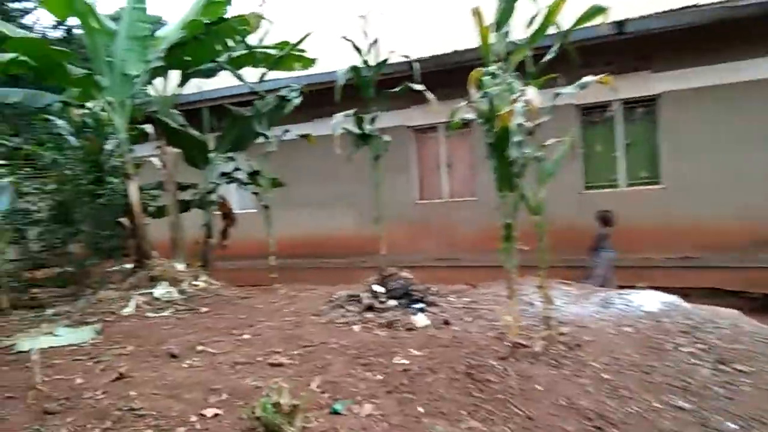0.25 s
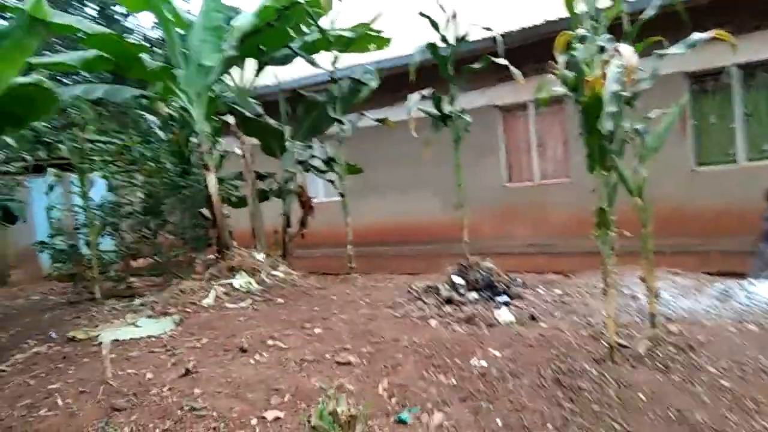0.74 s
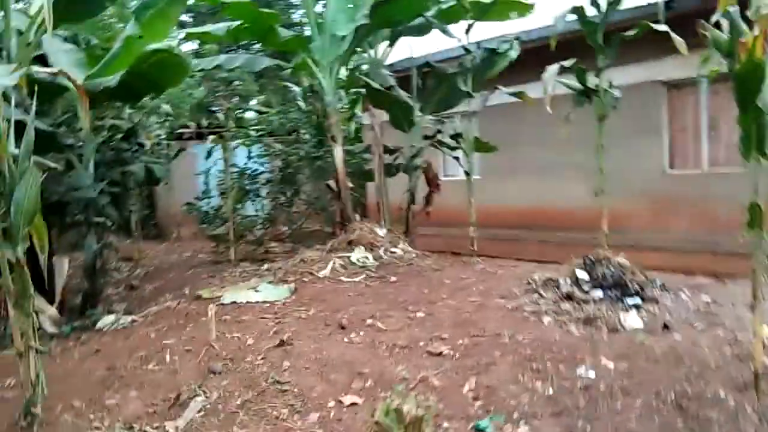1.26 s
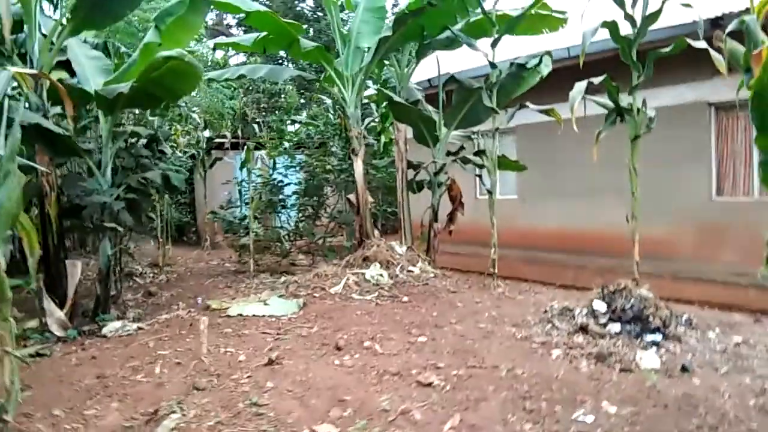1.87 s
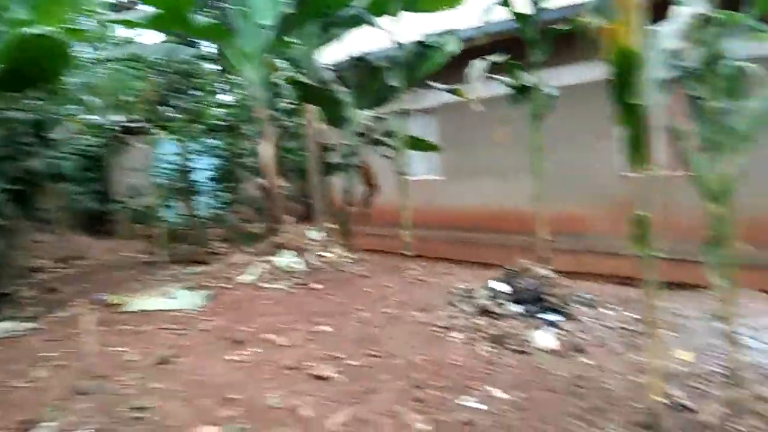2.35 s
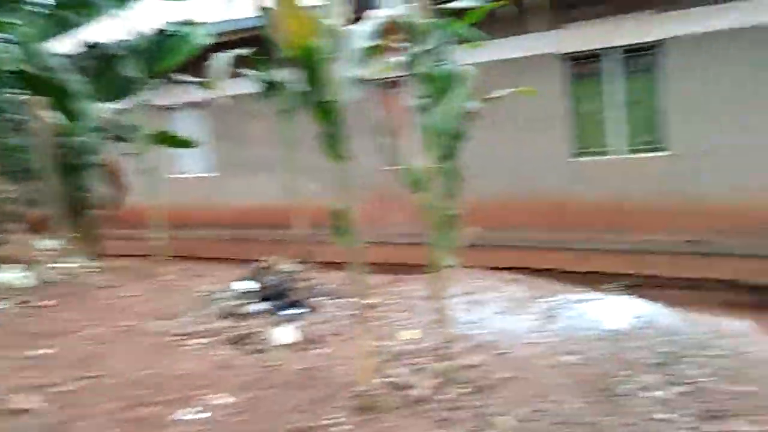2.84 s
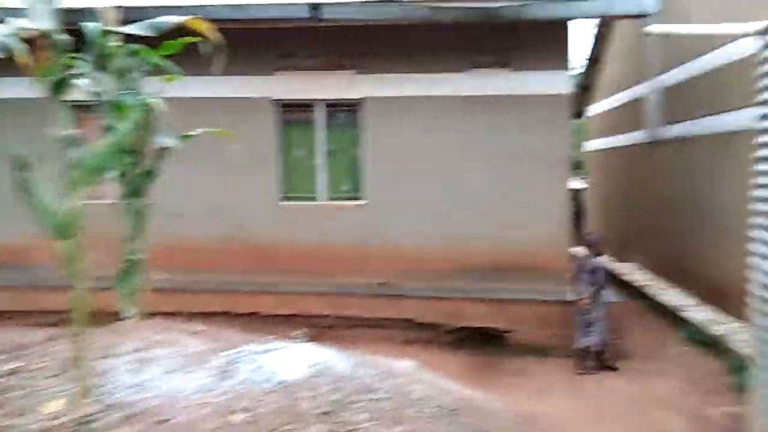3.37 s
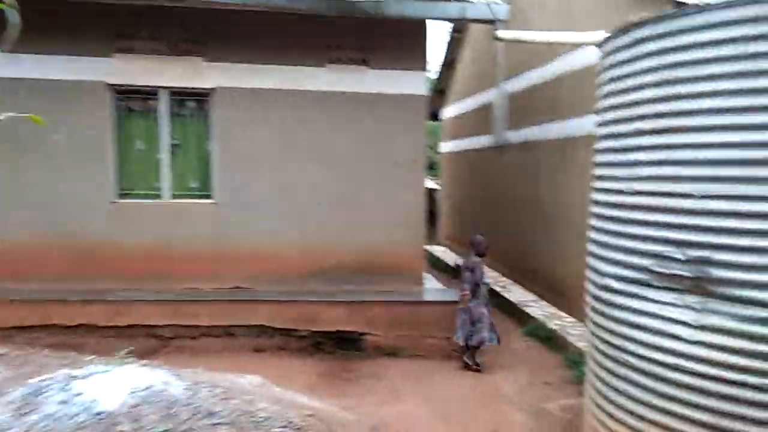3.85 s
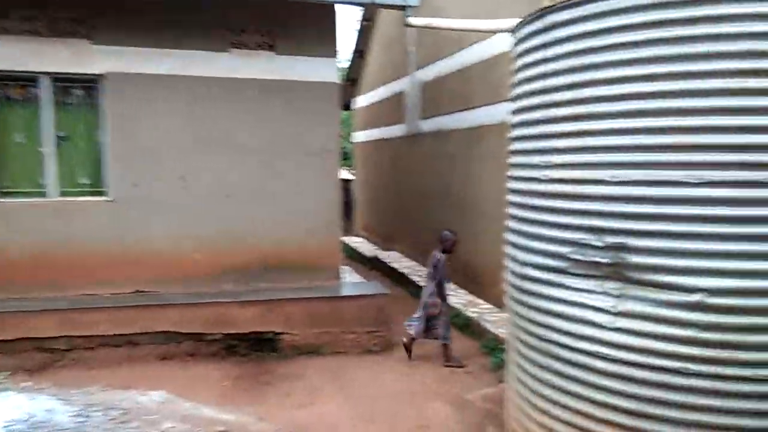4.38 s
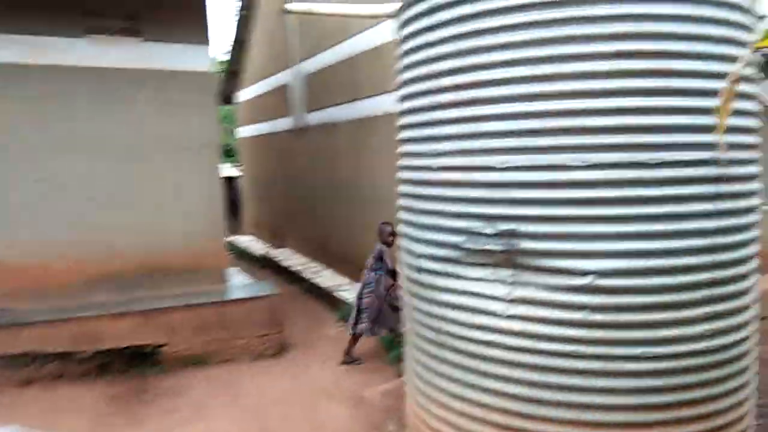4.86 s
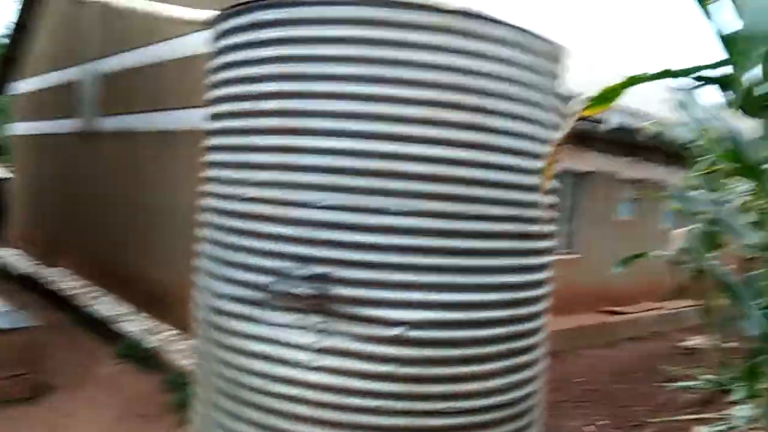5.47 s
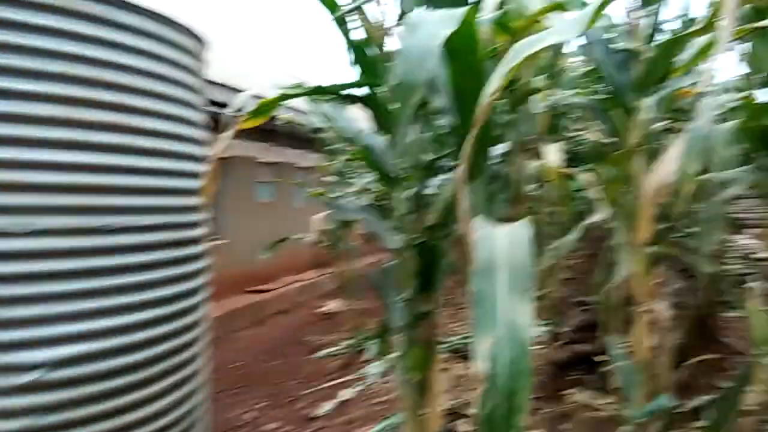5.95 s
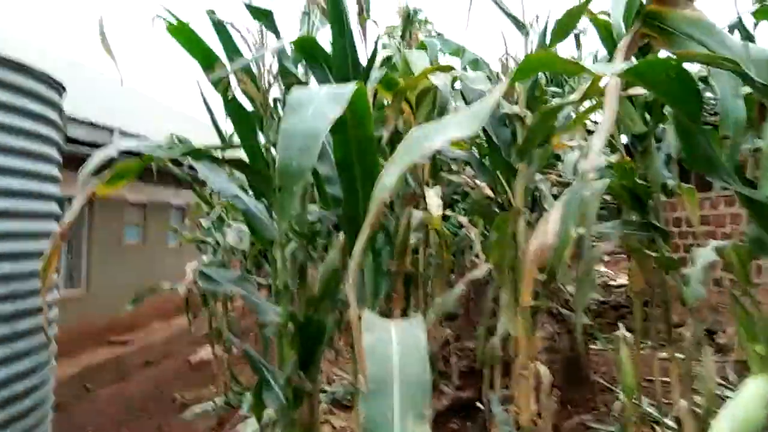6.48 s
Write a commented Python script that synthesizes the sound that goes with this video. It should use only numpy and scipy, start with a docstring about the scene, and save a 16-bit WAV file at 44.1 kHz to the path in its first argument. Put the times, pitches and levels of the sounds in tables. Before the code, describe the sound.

Quick bird chips echo off house walls, with three trembling calls, faint whistles and brief handling scuffs above a deep rumble and thin hiss.

```python
"""A farmyard between house walls, with small birds over a low outdoor rumble, a distant wash and thin hiss.
A near bird gives three buzzy, swooping calls: tones whose pitch and level are quickly shaken.
Another bird chips about three times a second in its runs; each chip is an arch of pitch, echoed by walls.
Thin gliding whistles come from farther off, and now and then a hand rubs or knocks the camera body,
made from shaped noise and short rings. The rumble, the wash and the hiss are coloured noise."""
import sys
import numpy as np
from scipy import signal
from scipy.fft import rfft, irfft
from scipy.io import wavfile
from scipy.ndimage import uniform_filter1d

SR = 44100
rng = np.random.default_rng(int(sys.argv[2]) if len(sys.argv) > 2 else 0)


def store_wav(level_fs):
    """Save 16-bit WAV to argv[1]."""
    pcm = np.round(np.clip(np.atleast_2d(level_fs), -1, 1) * 32767)
    wavfile.write(sys.argv[1], SR, pcm.T.astype(np.int16))


N = 296352
TIME = np.arange(N) / SR  # seconds
ECHO_TAPS_PER_S = 2500  # average number of single reflections in a second


def gain_of(db):
    """Turns decibels into amplitude."""
    return 10 ** (np.asarray(db) / 20)


def evened(x):
    """Scales a signal to an rms (average strength) of 1."""
    return x / np.sqrt(np.mean(x ** 2) + 1e-20)


def read(points, hz):
    """Reads a curve over frequency, with straight lines between points on a log-frequency axis."""
    point_hz, value = np.transpose(points)
    return np.interp(np.log(hz + 1), np.log(point_hz + 1), value)


def follow(rows, t=None):
    """Returns the times and the columns of a table whose first column is time, sample by sample."""
    s, *columns = np.transpose(rows)
    if t is None:
        t = np.arange(s.min(), s.max(), 1 / SR)
    return [t] + [np.interp(t, np.sort(s), column) for column in columns]


def add(mix, s, sound):
    """Mixes a sound in, starting at time s."""
    part = mix[max(round(s * SR), 0):][:len(sound)]
    part += sound[:len(part)]


def colour(x, spectrum):
    """Filters a signal by a spectrum in (Hz, dB), then scales it to rms 1."""
    hz = np.fft.rfftfreq(len(x), 1 / SR)
    return evened(irfft(rfft(x) * gain_of(read(spectrum, hz)), len(x)))


def wander(size, hz):
    """Smooth random motion of about rms 1, changing at rates up to roughly hz."""
    f = np.fft.rfftfreq(size + SR, 1 / SR)
    smooth = rfft(rng.standard_normal(size + SR)) * np.exp(-(f / hz) ** 2)
    return evened(irfft(smooth))[:size]


def random_taps(size):
    """Sparse single reflections at random moments, each upright or flipped."""
    return rng.choice([-1., 1.], size) * (rng.random(size) < ECHO_TAPS_PER_S / SR)


def yard(x, t60_factor, gap):
    """Scatter from ground, leaves and walls: sparse echoes after a gap in seconds, the top treble dying first."""
    # How fast echoes die. Each row: frequency in Hz, time to fall 60 dB in s before t60_factor scales it.
    fading = [(1500, 0.41), (3000, 0.43), (5000, 0.44), (9000, 0.24)]
    t = np.arange(SR // 2) / SR
    taps = random_taps(len(t)) * (t > gap)
    hz, s, z = signal.stft(taps, SR, nperseg=256)
    t60 = t60_factor * read(fading, hz)[:, None]
    tail = signal.istft(z * gain_of(-60 * s / t60), SR, nperseg=256)[1]
    return signal.fftconvolve(x, tail / np.linalg.norm(tail))[:N]


def walls(x, stretch=1):
    """A short, dense cloud of echoes from rough plaster and leaves, ending with the farthest wall."""
    # Scatter off the house fronts. Each row: delay in s before stretching, relative level in dB.
    scatter = [(.004, -25.5), (0.011, 0), (.035, 4), (.06, -9), (.082, -8), (.1, -38)]
    t, db = follow(np.array(scatter) * [stretch, 1])
    taps = gain_of(db) * random_taps(len(t))
    taps = np.r_[np.zeros(max(round(t[0] * SR), 0)), taps]
    return signal.fftconvolve(x, taps / np.linalg.norm(taps))[:N]


def hiss(shared_db=-87, ear_db=-87.5):
    """Thin microphone hiss: one noise shared by both ears, plus a treble noise of each ear's own."""
    # Tone of the shared hiss. Each row: frequency in Hz, relative level in dB.
    shared_colour = [(1000, -24), (2500, 0), (4000, -1.5), (6300, -4.5), (10000, -9), (14000, -13.5)]
    ear_colour = [(3000, -32), (7000, -4), (14000, -3.5)]  # (Hz, relative dB)
    own = [colour(rng.standard_normal(N), ear_colour) for _ in range(2)]
    shared = colour(rng.standard_normal(N), shared_colour)
    return gain_of(shared_db) * shared + gain_of(ear_db) * np.array(own)


def patchy(x, depth_db, span_s=.16, span_hz=70):
    """Lets narrow bands of a noise come and go on their own, by smoothed random gains."""
    z = signal.stft(x, SR, nperseg=2048)[2]
    field = uniform_filter1d(rng.standard_normal(z.shape), max(round(span_s * SR / 1024), 1), axis=1)
    field = uniform_filter1d(field, max(round(span_hz * 2048 / SR), 1), axis=0)
    return evened(signal.istft(z * gain_of(depth_db * evened(field)), SR, nperseg=2048)[1][:N])


def air(flicker_db=1.63, patch_db=3.0):
    """Distant wash of the countryside: two noise colours, traded as the camera turns between the walls."""
    # Colour facing the open yard. Each row: frequency in Hz, relative level in dB.
    open_colour = [(100, -11.5), (160, 10.5), (215, -5), (280, 8.5), (375, -11.5), (440, 0.5), (510, -14),
                   (570, -1), (650, -5), (740, 2.5), (860, -3), (1050, -9.5), (1700, -16), (2500, -25.5),
                   (8000, -53)]
    # Colour facing the passage between the houses. Each row: frequency in Hz, relative level in dB.
    passage_colour = [(100, -7.5), (160, 3.5), (215, -14), (275, 6.5), (375, -17), (450, -1), (570, 4.5),
                      (650, -6.5), (740, 0.5), (830, -13.5), (1000, -5), (1400, -16.5), (2000, -21),
                      (3000, -37.5), (8000, -53)]
    # Slow level of the wash. Each row: time in seconds, level in dB.
    slow_level = [(0, -66), (1.5, -65), (3, -68.5), (4.1, -61), (5.5, -69), (5.9, -64), (6.72, -72)]
    from_s, to_s, turn_s = 3.25, 5.02, 0.59  # middles of the two turns; time taken by a full turn
    least_after = 0.31  # share of the passage that stays once the first turn is half done
    turned = .5 + np.minimum(TIME - from_s, to_s - TIME) / turn_s
    share = np.clip(turned, least_after * (TIME > from_s), 1)
    # square roots, so that the powers of the two colours trade places
    wash = np.sqrt(1 - share) * colour(rng.standard_normal(N), open_colour)
    wash = wash + np.sqrt(share) * colour(rng.standard_normal(N), passage_colour)
    level_db = follow(slow_level, TIME)[1] + flicker_db * wander(N, 18)
    return gain_of(level_db) * patchy(wash, patch_db)


def swells(rows):
    """Level over time of smooth, bell-shaped swells whose powers add."""
    return np.sqrt(sum(gain_of(db) ** 2 * np.exp(-((TIME - s) / half) ** 2) for s, half, db in rows))


def rumble(lumps_db=2.0, gust_db=-5.0, gust_lumps_db=2):
    """A deep, lumpy outdoor rumble, and a hollower rush of air that swells near the end."""
    # Colour of the deep rumble. Each row: frequency in Hz, relative level in dB.
    deep_colour = [(10, -50.5), (25, -27), (38, -16.5), (52, 0.5), (70, 3), (85, 2), (100, -6), (130, -7.5),
                   (165, -17.5), (230, -29), (380, -42.5), (700, -75.5)]
    # Colour of the hollow rush. Each row: frequency in Hz, relative level in dB.
    rush_colour = [(40, -61), (100, -15.5), (135, -12), (170, -1), (205, 3.5), (240, -18), (280, -12),
                   (330, -12.5), (375, -27.5), (900, -80)]
    # Steady part of the rumble. Each row: time in seconds, level in dB.
    deep_bed = [(0, -60.5), (3.6, -59), (4.4, -53.5), (5.7, -57), (6.72, -63)]
    # Buffets of the rumble. Each row: middle in seconds, half-length in seconds, level in dB.
    buffets = [(.02, 0.064, -52), (2.09, 0.065, -55.5), (2.35, 0.015, -49.5), (4.2, 0.028, -45.5),
               (4.59, 0.022, -49), (4.84, 0.046, -52.5), (5.2, 0.058, -55.5), (5.76, 0.036, -48.5)]
    # Swells of the rush. Each row: middle in seconds, half-length in seconds, level in dB before gust_db.
    rush_swells = [(5.53, 0.021, -46.5), (5.79, 0.044, -46), (6.0, 0.15, -51), (5.9, 0.45, -56)]
    bed = gain_of(follow(deep_bed, TIME)[1] + lumps_db * wander(N, 12))
    deep = np.hypot(bed, swells(buffets))
    rush_bed = gain_of(-69 + gust_lumps_db * wander(N, 3.9))  # also before gust_db
    rush = gain_of(gust_db) * np.hypot(rush_bed, swells(rush_swells))
    return deep * colour(rng.standard_normal(N), deep_colour) + rush * colour(rng.standard_normal(N), rush_colour)


def body_ring(low_cut_hz=760, crest_s=.0008):
    """The camera body struck once: a few modes swell and die within a few cycles; returns it and its crest time."""
    # Modes of the body. Each row: frequency in Hz, relative level in dB, time constant in seconds.
    modes = [(1154, -1.5, 0.00034), (1455, -3.5, 0.00056), (2360, -12, .00035), (4724, -24.5, 0.0015)]
    t = np.arange(SR // 20) / SR
    ring = np.zeros(len(t))
    for hz, db, tau in modes:
        swell = (t / tau) ** 2 * np.exp(-t / tau)
        ring += gain_of(db) * swell * np.cos(2 * np.pi * hz * (t - crest_s))  # all waves crest together
    ring = signal.sosfilt(signal.butter(4, low_cut_hz, "high", fs=SR, output="sos"), ring)
    return ring / abs(ring).max(), crest_s


def hand(grain_db=1.0, yard_db=-22, walls_db=-22):
    """Skin sticks and slips on the camera: single slips ring its body, fine ones merge to a scuff of noise."""
    # Finger slips and small knocks. Each row: time of the crest in seconds, peak level in dB.
    slips = [(1.047, -40), (1.0534, -31), (1.056, -25), (1.0623, -44), (1.0656, -28), (1.0677, -20),
             (1.0702, -23.5), (1.0719, -21.5), (2.569, -56.5), (4.022, -51.5), (4.091, -45), (5.878, -50.5)]
    # Rubs, most pressing harder before letting go; a negative build-up eases off instead.
    # Each row: start in seconds, length in seconds, last level in dB, build-up in dB.
    rubs = [(1.039, 0.031, -43, 15.5), (1.077, 0.024, -58.5, 3), (2.662, 0.0096, -69.5, 7),
            (5.66, 0.029, -75, 9), (6.285, .05, -46.5, 12), (6.34, 0.042, -71, -19.5)]
    # Tone of the rubs. Each row: frequency in Hz, relative level in dB.
    rub_colour = [(500, -75), (1000, -11.5), (1400, -5.5), (1770, 3.5), (2300, -7.5), (3000, -12),
                  (4200, -11), (5200, -4), (6300, -18), (8000, -32), (10000, -34.5), (14000, -42)]
    attack_s, release_s = 0.0012, 0.0057
    out = np.zeros(N)
    ring, crest_s = body_ring()
    for s, db in slips:
        add(out, s - crest_s, gain_of(db) * ring)
    for s, length, db, build_db in rubs:
        t = np.arange(0, length + 10 * release_s, 1 / SR)
        touch = np.minimum(t / attack_s, 1) * np.exp(-np.maximum(t - length, 0) / release_s)
        pressure = gain_of(db + build_db * np.minimum(t / length - 1, 0))
        grains = rng.standard_normal(len(t)) * gain_of(grain_db * wander(len(t), 518))
        add(out, s, touch * pressure * colour(grains, rub_colour))
    near_echoes = gain_of(walls_db) * walls(out, stretch=.6)
    return out + near_echoes + gain_of(yard_db) * yard(out, t60_factor=0.7, gap=.008)


def far_birds(yard_db=-7, flutter_db=4.0):
    """Thin gliding notes with an octave overtone, some raspy, fluttering on their way through the leaves."""
    # Each row: start in seconds, length in seconds, first pitch in Hz, last pitch in Hz, level in dB,
    # octave overtone in dB against the note, rasp as a share of the pitch.
    whistles = [(0.204, 0.093, 3200, 3850, -85, -30, .008), (0.592, .04, 3030, 2910, -80, -28, .01),
                (0.618, 0.052, 4340, 4630, -70.5, -29, 0.022), (2.775, 0.27, 3290, 2693, -71.5, -32, 0.013),
                (3.003, .026, 4140, 3730, -57, -12.5, 0.032), (3.024, 0.022, 3150, 3150, -61.5, -19, 0.046),
                (3.038, 0.0243, 4180, 4520, -65, 5, 0.038), (3.043, .036, 6170, 4680, -57.5, -14.5, 0.042),
                (4.826, .07, 4880, 4700, -81, -30, 0.043), (4.917, 0.028, 4860, 4950, -75.5, -30, 0.033),
                (4.962, 0.034, 4920, 4650, -78, -30, 0.032), (5.12, 0.32, 1874, 1730, -82, -31, 0.039),
                (5.87, 0.064, 2500, 2405, -81, -33.5, .015)]
    attack_share, release_share = .15, .4  # of a note's length
    out = np.zeros(N)
    for s, length, first_hz, last_hz, db, octave_db, rasp in whistles:
        u = np.arange(0, length, 1 / SR) / length  # 0 to 1 along the note
        hz = first_hz * (last_hz / first_hz) ** u
        phase = 2 * np.pi * np.cumsum(hz * (1 + rasp * wander(len(u), 600))) / SR
        shape = np.clip(np.minimum(u / attack_share, (1 - u) / release_share), 0, 1)
        level = shape * gain_of(db + flutter_db * wander(len(u), 42))
        add(out, s, level * (np.sin(phase) + gain_of(octave_db) * np.sin(2 * phase)))
    return out + gain_of(yard_db) * yard(out, t60_factor=0.78, gap=.002)


CHIP_RISE_S, CHIP_FALL_S = .022, .033  # from the start of a chip to its top pitch, and on to its end


def chip(pitch, fall_db, skip_s, jitter=.03, flutter_db=2.5):
    """One rough arch of pitch, loud in an accent before its top and another after; skip_s cuts the foot."""
    top_hz, start_hz, end_hz = 5376, 2530, 2050  # before the pitch factor
    up_s, down_s = 0.007, 0.022  # accents: time before and after the top
    up_width_s, down_width_s = 0.0059, 0.0086
    held_db = -21.5  # the tone between the accents
    t = np.arange(-CHIP_RISE_S, CHIP_FALL_S, 1 / SR)
    away = np.where(t < 0, t / CHIP_RISE_S, t / CHIP_FALL_S) ** 2  # 0 at the top, 1 at the ends
    hz = top_hz + away * (np.where(t < 0, start_hz, end_hz) - top_hz)
    up = np.exp(-((t + up_s) / up_width_s) ** 2)
    down = np.exp(-((t - down_s) / down_width_s) ** 2)
    level = up + gain_of(fall_db) * down + gain_of(held_db) * (1 - away) ** 2
    level = level * gain_of(flutter_db * wander(len(t), 250))
    level = level * np.clip((t - t[0] - skip_s) / 0.0039, 0, 1)  # fade in after the skipped foot
    return level * np.sin(2 * np.pi * np.cumsum(pitch * hz * (1 + jitter * wander(len(t), 400))) / SR)


def chipping_bird(yard_db=-14, walls_db=-1.5, bounce_delay=0.0073, bounce_db=-3, leaves_db=-7,
                  leaves_lead_s=.014, skip_s=0.011):
    """Each chip is one quick arch of pitch; when the bird is screened, mostly its echoes arrive."""
    # Each row: time of the top in seconds, level in dB, pitch factor, accent on the fall in dB,
    # direct sound in dB, length factor of the wall echoes.
    chips = [(.031, -46, 1.006, -4.5, 0, 0.98), (.359, -49.5, .96, -7.5, 1, 0.94),
             (0.692, -46.5, .97, -8.5, 0, 0.98), (1.936, -67, 0.96, -6, -3, 0.32),
             (3.135, -61.5, 1, 3, -2.5, 0.36), (3.465, -60, 1.07, 2.5, -6, .65),
             (3.789, -53.5, .935, -13.5, -3, 0.83), (4.112, -46.5, 0.99, -8, -6.5, 1),
             (4.422, -54, 1.016, -4.5, -13, 0.91), (4.734, -55.5, 0.94, -9, -12, 0.87),
             (5.054, -54, 0.95, -11.5, -8.5, 0.56), (5.362, -53.5, .96, -11, -7.5, 0.74)]
    direct, echoes, sent = np.zeros((3, N))
    for s, db, pitch, fall_db, direct_db, stretch in chips:
        screened = np.clip(1 - gain_of(direct_db), 0, 1)
        start = s - CHIP_RISE_S
        note = gain_of(db) * chip(pitch, fall_db, skip_s * np.sqrt(screened))
        add(sent, start, note)
        add(direct, start, gain_of(direct_db) * note)
        add(echoes, start, walls(note, stretch))
        # a weak early part slips through the leaves
        add(echoes, start - leaves_lead_s, screened * gain_of(leaves_db) * walls(note, stretch))
    # one bounce off the nearest wall
    bounce = gain_of(bounce_db) * np.interp(TIME - bounce_delay, TIME, direct, left=0)
    tail = gain_of(yard_db) * yard(sent, t60_factor=0.77, gap=.002)
    return direct + bounce + gain_of(walls_db) * echoes + tail


def near_bird(jitter_hz=70, throb=0.35, ground_db=-8, walls_db=-15, yard_db=-14, noise_db=-45, high_noise_db=-42):
    """A nearly pure tone swoops down, up and down; a fast tremble shakes its pitch and level."""
    # The calls. Each row: time in seconds, level in dB, pitch factor, length factor,
    # stress on the closing fall in dB.
    calls = [(1.711, -40, 1, 1, -1.5), (4.049, -39.5, 1, 0.97, 3.5), (6.030, -35, 1, 1, -4)]
    # Shape of one call: a faint pip, a falling buzz, a clear held note, a rising buzz, a clear fall.
    # Each row: time from its attack in s before the length factor, pitch in Hz before the pitch factor,
    # relative level in dB, depth of the buzz in the pitch in Hz.
    call_shape = [(-.016, 5060, -35.5, 30), (-.002, 5200, -28.5, 300), (.004, 4353, -9, 650),
                  (.016, 4083, -2.5, 706), (0.024, 3855, -5, 350), (.031, 3607, -2, 30),
                  (.048, 3325, 0, 40), (0.062, 2600, -9, 420), (0.078, 3250, -3, 500), (.102, 3673, 2, 537),
                  (.114, 2919, -1.5, 80), (.123, 2480, 0.5, 30), (.131, 1902, -11.5, 30.04),
                  (.136, 1655, -21.5, 30)]
    # Octave of the call. Each row: frequency of the octave in Hz, its level against the tone in dB.
    octave = [(4000, -19), (5600, -26), (6500, -40.5), (8000, -48)]
    buzz_hz = 149.1  # average rate at which the pitch shakes
    closing_from_s, closing_build_s = .105, 0.014  # where the closing stress starts; time it takes to build
    out = np.zeros(N)
    for s, level_db, pitch, stretch, stress_db in calls:
        t, hz, db, depth_hz = follow(np.array(call_shape) * [stretch, pitch, 1, 1])
        db = db + level_db + stress_db * np.clip((t - closing_from_s) / closing_build_s, 0, 1)
        buzz = 2 * np.pi * np.cumsum(buzz_hz * (1 + .12 * wander(len(t), 60))) / SR
        hz = hz + depth_hz * (np.sin(buzz) + 0.283 * wander(len(t), 550))
        hz = hz + jitter_hz * wander(len(t), 420)
        phase = 2 * np.pi * np.cumsum(hz) / SR
        swell = 1 - throb * depth_hz / depth_hz.max() * np.cos(buzz)  # strongest as the pitch drops
        tone = np.sin(phase) + gain_of(read(octave, 2 * hz)) * np.sin(2 * phase)
        add(out, s + t[0], np.sqrt(2) * gain_of(db) * swell * tone)
    ground = gain_of(ground_db) * yard(out, t60_factor=0.07, gap=.002)
    wall_echoes = gain_of(walls_db) * walls(out, stretch=1.15)
    tail = gain_of(yard_db) * yard(out, t60_factor=0.74, gap=.012)
    out = out + ground + wall_echoes + tail
    # faint noise at 5-10 kHz and a thin band of noise near 13-14 kHz rise and fall with the calls' loudness
    loudness = np.sqrt(abs(uniform_filter1d(out ** 2, size=1400)))
    noise_colour = [(3000, -25.5), (5500, -0.5), (7000, 0.5), (9000, 0.5), (12000, -12.5)]  # (Hz, relative dB)
    high_noise_colour = [(9000, -40), (11500, -12), (13300, 0), (14200, 0), (15000, -40)]
    noise = gain_of(noise_db) * colour(rng.standard_normal(N), noise_colour)
    high_noise = gain_of(high_noise_db) * colour(rng.standard_normal(N), high_noise_colour)
    return out + loudness * (noise + high_noise)


def scene():
    """Adds all sources; they sit in the middle, and only the hiss differs between the ears."""
    return hiss() + air() + rumble() + hand() + far_birds() + chipping_bird() + near_bird()


def record(dry):
    """Limits the band: a smooth filter takes away what lies above 14.3 kHz."""
    low_pass = signal.firwin(511, 14300, window=("kaiser", 9), fs=SR)
    return signal.oaconvolve(dry, low_pass[None], "same")


dry = scene()
out = record(dry)
store_wav(out)
```